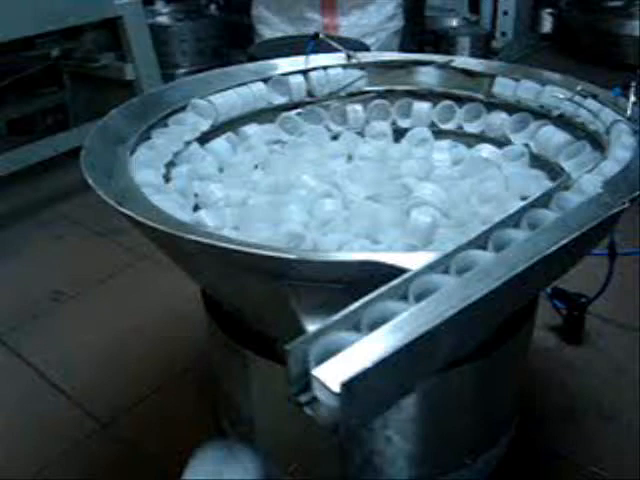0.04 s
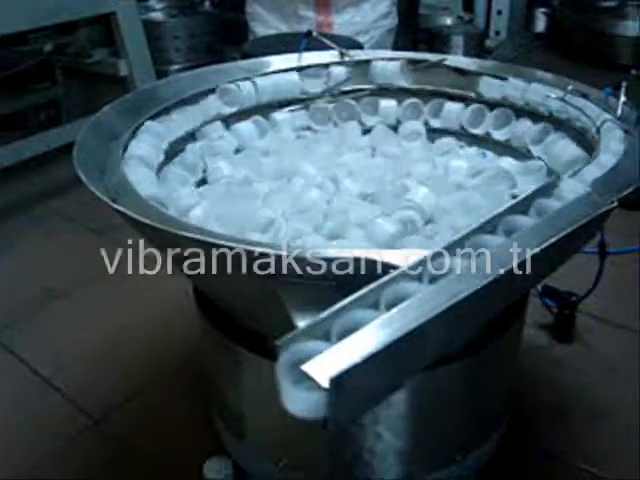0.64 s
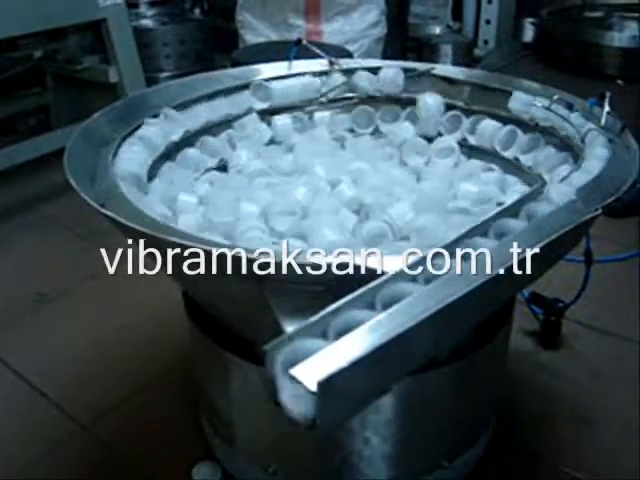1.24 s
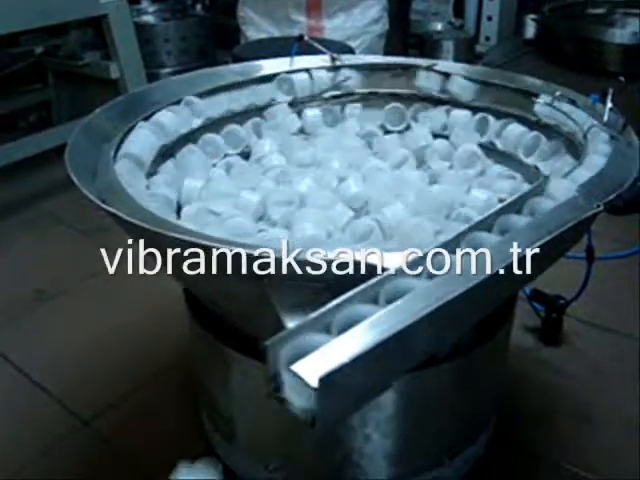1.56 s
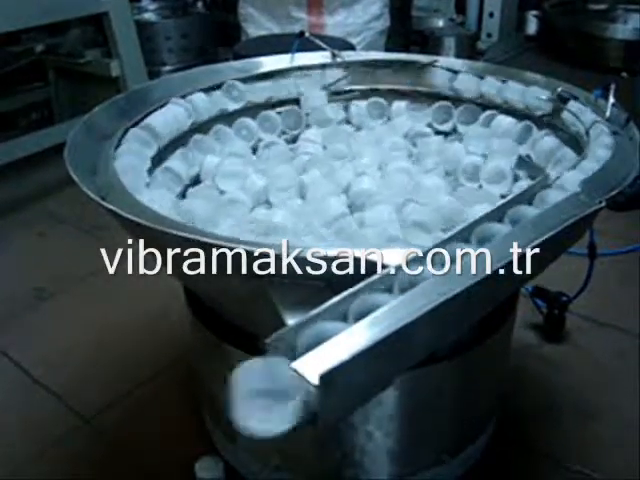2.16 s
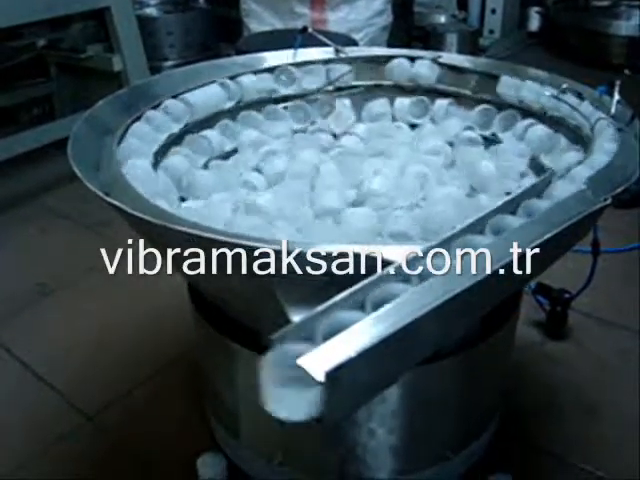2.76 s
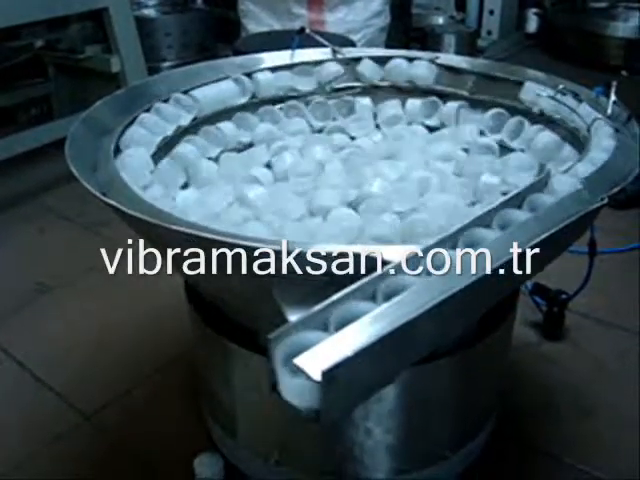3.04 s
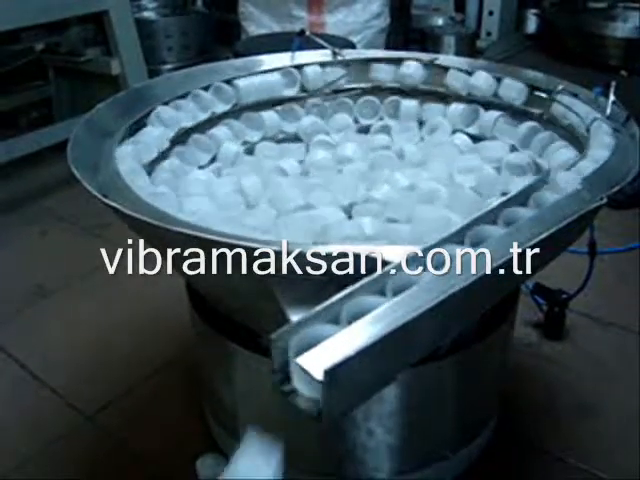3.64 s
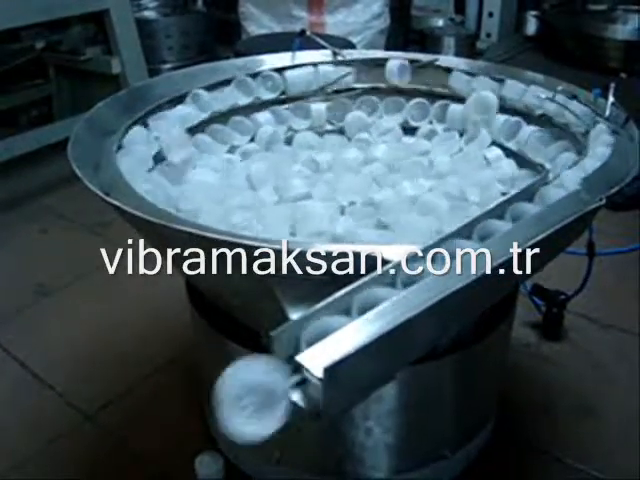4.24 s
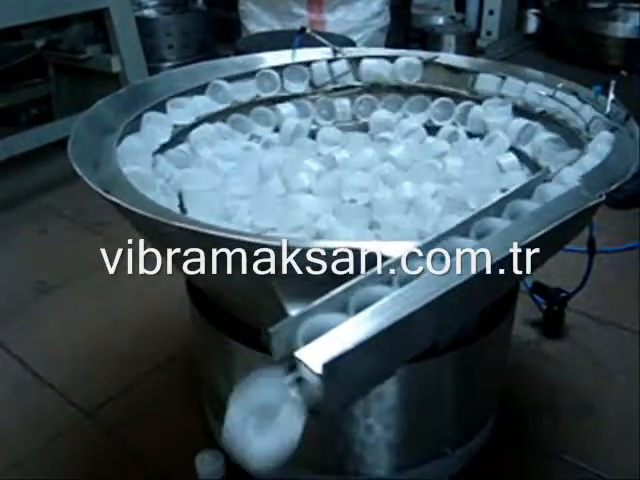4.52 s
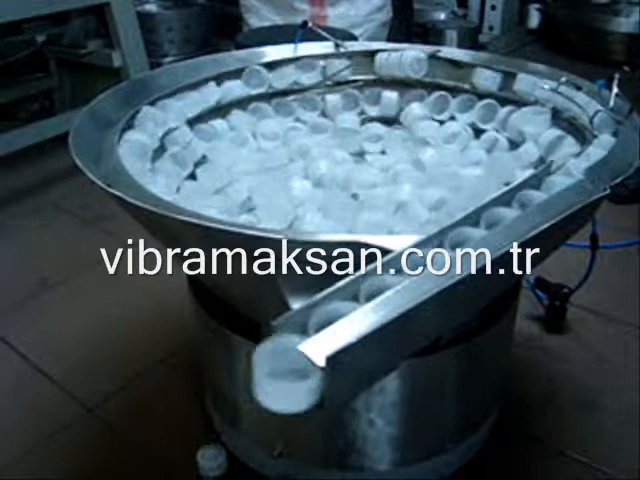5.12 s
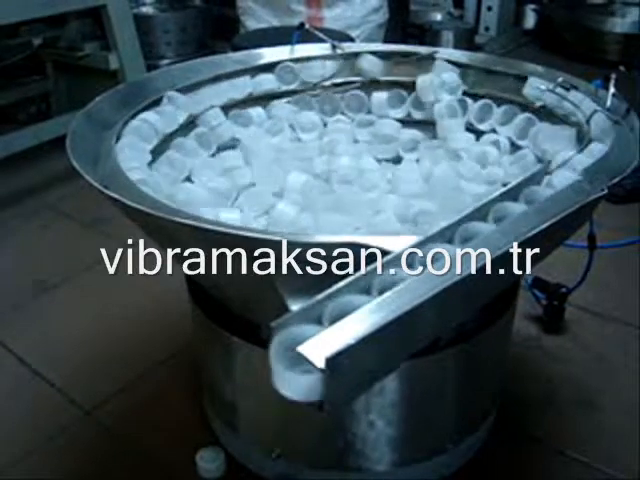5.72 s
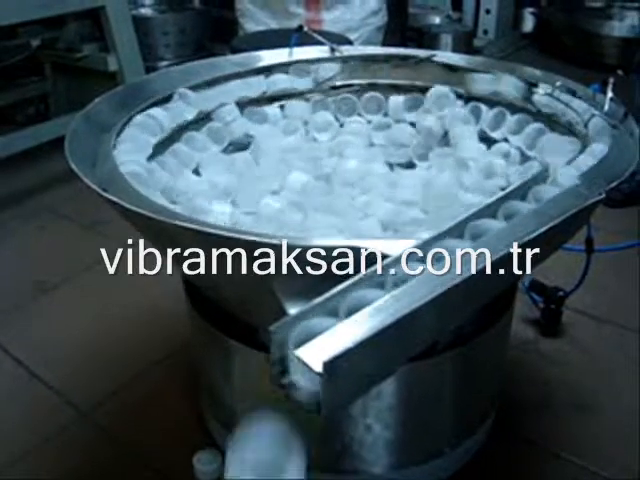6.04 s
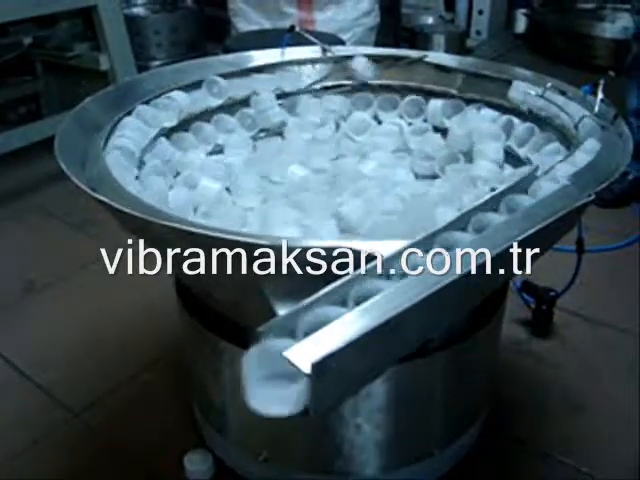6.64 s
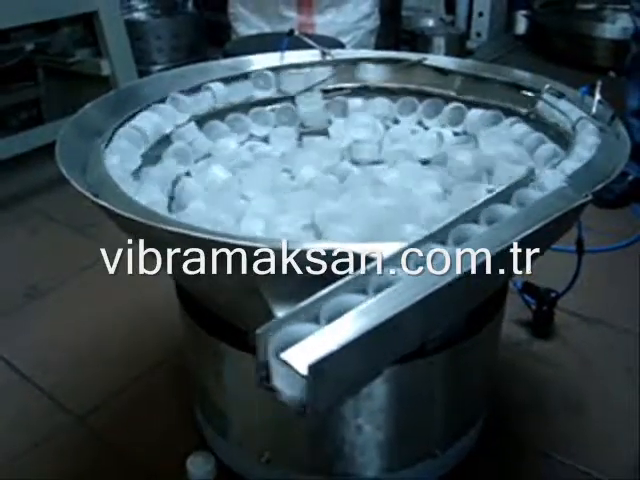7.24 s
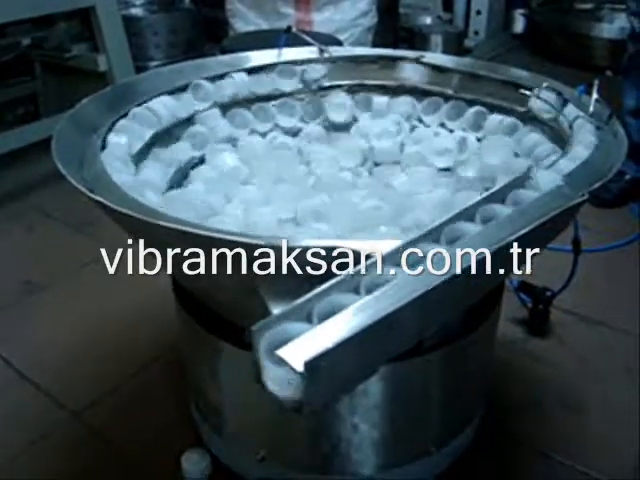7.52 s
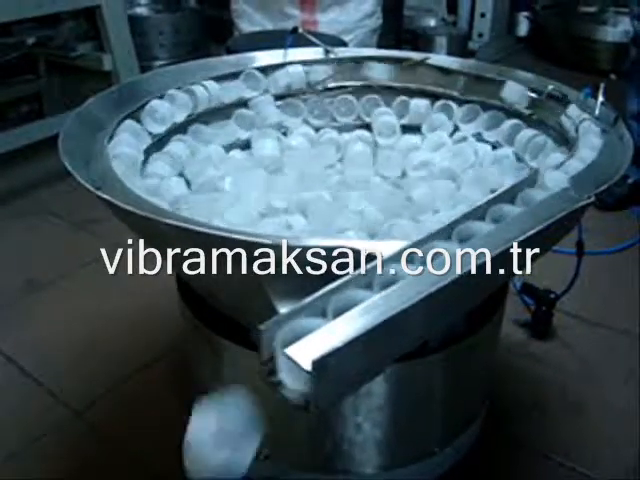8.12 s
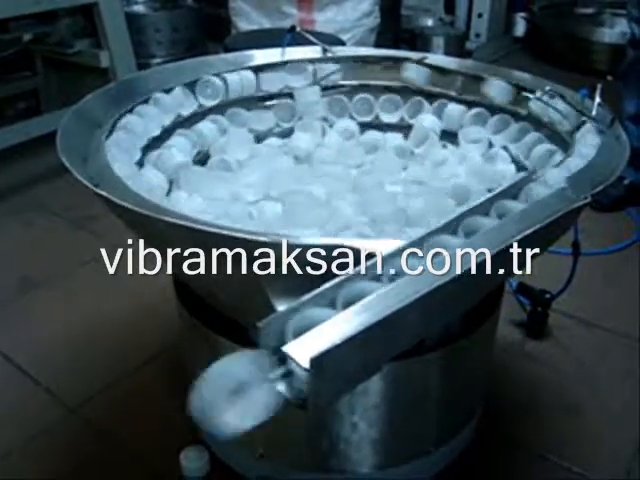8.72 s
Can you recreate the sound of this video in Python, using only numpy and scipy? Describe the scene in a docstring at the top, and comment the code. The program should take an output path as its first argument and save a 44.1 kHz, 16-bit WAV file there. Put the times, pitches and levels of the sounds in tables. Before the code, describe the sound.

Plastic caps chatter continuously in a shaking metal bowl over a faint hum, some clacking on the steel or dropping with hollow knocks.

```python
"""A workshop, one microphone on a running vibratory bowl feeder: hundreds of hollow plastic caps chatter
on the shaking steel. The heap surges gently, its clicks ring the bowl, and the drive hums underneath.
Now and then a cap clacks or drops with a hollow knock; one dull bump sounds over the room's faint rush.
The microphone is a small camera's, switched on after a moment: a narrow band with sample-and-hold fizz."""
import sys
import numpy as np
from scipy import signal
from scipy.fft import rfft, irfft, next_fast_len
from scipy.io import wavfile
from scipy.ndimage import map_coordinates

SR = 44100
rng = np.random.default_rng(int(sys.argv[2]) if len(sys.argv) > 2 else 0)


def log_audio(samples):
    """Write samples as a 16-bit WAV file to the path given in sys.argv[1]."""
    # one column per channel
    frames = np.atleast_2d(samples).T
    # limit to full scale, then quantise
    limited = np.clip(frames, -1, 1)
    pcm = np.round(limited * 32767).astype(np.int16)
    wavfile.write(sys.argv[1], SR, pcm)


N = 391166
SHAKE_HZ, ROOM_T60_S = 100, 0.57
BAND_HZ = 4540  # upper edge of the camera's band, and the width of the span of the ticks' pitches above 250 Hz


def chatter():
    """The heap surges on the steel: heavy contacts carry the swell, light ones in the treble follow less."""
    # Loudness of the heap. Each row: time in seconds, level in dB, swing of the surges in dB.
    heap_levels = [(.18, -19.5, .2), (.6, -21.5, 0.2), (1.8, -20.9, 0.8), (2.2, -21, 0.1), (3.3, -21, 0.5),
                   (4.5, -21.6, -0.3), (5.55, -21.5, .4), (6.12, -20, 0.5), (6.55, -21, 1),
                   (6.9, -20.5, 0.5), (7.4, -20.5, -0.2), (7.8, -21.6, 0.5), (8.1, -21, 1.0),
                   (8.5, -21, -0.1)]
    sound = unit(plastic_caps() + amp(-10.5) * steel_bowl())
    treble = filtered(sound, lambda hz: 1 - 1 / (1 + (hz / 2300) ** 8))
    level_db, swing_db = curves(heap_levels)
    surge_db = swing_db * surges()
    flicker_db = 0.5 * wobble(per_s=8)
    heavy = amp(level_db + surge_db) * (sound - treble)
    light = amp(-20.5 + 0.59 * surge_db + flicker_db) * treble
    jostle_db = 0.11 * wobble(per_s=9)
    return amp(jostle_db) * (heavy + light)


def plastic_caps():
    # Colour of the chattering caps. Each row: frequency in Hz, gain in dB.
    colour = [(170, -44), (335, -35.5), (390, -16), (620, -17), (780, -12.5), (1150, -3.5), (1750, -2),
              (2060, -1.5), (2250, -6.5), (2800, -5), (3250, -7), (3800, -12.5), (4500, -13.5)]
    ticks = contacts(count=20000, spread_db=2.5, t60=0.011, scatter_cycles=.35)
    heap = unit(workshop(ticks + amp(4.5) * snaps(count=9000), wet_db=-1))
    return unit(filtered(heap, lambda hz: amp(along(colour, hz))))


def contacts(count, spread_db, t60, scatter_cycles):
    """Tiny ticks of plastic, thrown loosely in step with the shaking, each at its own pitch."""
    when, pitch = rng.random((count, 2)).T
    strength, late, life = rng.standard_normal((count, 3)).T
    cycle = np.floor(when * N / SR * SHAKE_HZ)
    times = (cycle + scatter_cycles * late) / SHAKE_HZ
    gains = amp(spread_db * np.clip(strength, -2, 2))
    return unit(rings(times, gains, 250 + pitch * BAND_HZ, t60 * np.exp(0.2 * life), samples=400))


def snaps(count):
    """Rim against steel: clicks that excite all pitches at once."""
    at = (rng.random(count) * N).astype(int)
    return unit(np.bincount(at, rng.choice([-1., 1.], count), N))


def surges(first_crest_s=.14):
    """The heap bunches up and loosens about three times a second: a curve between -1 and 1."""
    # Pace of the surging. Each row: time in seconds, surges per second.
    pace = [(6.1, 2.97), (6.3, 2.66)]
    rate, = curves(pace)
    return np.cos(2 * np.pi * (np.cumsum(rate) / SR - first_crest_s * rate[0]))


def steel_bowl():
    """A hail of clicks keeps the bowl's resonances ringing."""
    # Modes of the bowl. Each row: centre in Hz, width in Hz, relative level in dB.
    modes = [(297, 26, -10), (395.7, 14, -4), (534, 42, -11.5), (659, 3.6, -5.5), (691, 8.6, 2),
             (712.4, 14.8, 6.5), (808, 7.3, -9), (868.4, 13.6, 3), (919.5, 19, 1.5), (1596, 11, 9),
             (1814, 87, 7.5), (2025, 80, 1), (2674, 8.1, 9), (3340, 20, -5)]

    def resonance(hz):
        return sum(amp(db) * 1j * hz * width / (centre ** 2 - hz ** 2 + 1j * hz * width)
                   for centre, width, db in modes)
    return unit(band(filtered(snaps(count=12000), resonance), low_hz=243, high_hz=4600))


def clacks():
    """Single caps hit the steel, hard or lightly: a bright note and a crack."""
    # The hardest strikes. Each row: start in seconds, relative level in dB, pitch in Hz.
    hard_clacks = [(0.9713, -3, 1690), (1.9589, -1, 1760), (2.9053, 1, 2080), (3.4496, 1, 1680),
                   (3.522, 0, 1750), (4.8216, -1, 1250), (5.9028, 1, 1850), (6.486, -3, 1700),
                   (7.66, 2, 2130), (8.077, 0, 1570), (8.3764, -1, 2040)]
    times, db, hz = np.vstack([hard_clacks, light_clacks(count=14)]).T
    note = rings(times, amp(db), hz, t60=.02, samples=2000)
    blows = note + amp(1) * cracks(times, db, t60=.012)
    return amp(-13) * band(workshop(blows, wet_db=-1.5), low_hz=990, high_hz=3500)


def light_clacks(count):
    """Lighter strikes at random. Each row: start in seconds, relative level in dB, pitch in Hz."""
    strength, detune = rng.standard_normal((count, 2)).T
    times = rng.random(count) * N / SR
    return np.column_stack([times, -9 + 5 * strength, 1830 * np.exp(0.066 * detune)])


def drops():
    """Falling caps land with a hollow knock and a slap of the rim, a little different each time."""
    # Caps landing. Each row: start in seconds, relative levels of knock and rim slap in dB.
    landings = [(0.766, -29, -28), (1.145, -27, -20), (1.773, -24, -28), (2.113, -26, -24),
                (2.124, -20.5, -21), (2.502, -23, -22), (3.55, -29, -25), (3.927, -24, -21),
                (5.534, -20, -29), (5.827, -24.5, -29), (6.621, -24, -23), (8.405, -29, -25)]
    # Hollow ring of a cap. Each row: pitch in Hz, relative level in dB, seconds to fall 60 dB.
    cap_modes = [(450, -2, .025), (540, 0, .025), (630, -1, .025)]
    times, knock_db, slap_db = np.transpose(landings)
    knocks = amp(10) * cracks(times, knock_db, t60=0.024)
    for hz, mode_db, t60 in cap_modes:
        strength, detune = rng.standard_normal((len(times), 2)).T
        gains = amp(knock_db + mode_db + strength)
        knocks += rings(times, gains, hz * np.exp(0.023 * detune), t60, samples=3000)
    body = amp(-3) * band(knocks, low_hz=400, high_hz=850)
    rim_hz = 900 * np.exp(0.067 * rng.standard_normal(len(times)))
    rim = rings(times, amp(slap_db + 3.5), rim_hz, t60=.02, samples=2000)
    slap = band(rim + amp(5) * cracks(times, slap_db, t60=.036), low_hz=744, high_hz=1130)
    return workshop(body + slap, wet_db=-15)


def bump():
    """One dull, low thud with a short puff of noise."""
    # The thud. Each row: start in seconds, relative level in dB.
    thuds = [(6.488, -49)]
    times, db = np.transpose(thuds)
    thud = rings(times, amp(db), hz=120., t60=.045, samples=4000)
    return amp(4) * band(thud + amp(12) * cracks(times, db, t60=.07), low_hz=55, high_hz=300)


def drive(rock_hz=16.31):
    """The bowl on its springs hums in slightly unsteady lines, all multiples of its slow rocking."""
    # Lines of the hum. Each row: multiple of the rocking rate, relative level in dB.
    hum_lines = [(12, -21.5), (14, -11.5), (15, -2), (16, -5.5), (17, 0.5), (19, -17), (20, -17), (29, -4),
                 (32, 0.5)]
    turns = rock_hz * np.arange(N) / SR + 0.0012 * wobble(per_s=3)
    hum = sum(amp(db + 0.94 * wobble(per_s=4.4)) * np.sin(2 * np.pi * (multiple * turns + rng.random()))
              for multiple, db in hum_lines)
    return amp(-49) * unit(hum)


def room_tone():
    """Faint low rush of the workshop."""
    # Colour of the rush. Each row: frequency in Hz, gain in dB.
    colour = [(10, 0), (40, -1.5), (150, 2), (250, -3), (400, 3), (900, -32)]
    return amp(-64) * unit(filtered(rng.standard_normal(N), lambda hz: amp(along(colour, hz))))


def workshop(x, wet_db):
    """Direct sound plus an echo that differs from place to place in the bowl: a new tail every 20 ms."""
    out, hop = np.pad(x, (0, SR)), SR // 50
    fade = amp(-60 * np.arange(SR // 4) / SR / ROOM_T60_S)
    for start in range(0, N, hop):
        tail = fade * rng.standard_normal(len(fade))
        echo = signal.fftconvolve(x[start:start + hop], tail / np.linalg.norm(tail))
        out[start:start + len(echo)] += amp(wet_db) * echo
    return out[:N]


def rings(times, gains, hz, t60, samples):
    """A damped sine at each contact, falling 60 dB in t60 seconds."""
    t = np.arange(samples) / SR
    decay = amp(-60 * t / np.reshape(t60, (-1, 1)))
    waves = gains[:, None] * decay * np.sin(2 * np.pi * np.reshape(hz, (-1, 1)) * t)
    at = (np.abs(times) * SR).astype(int)[:, None] + np.arange(samples)
    return np.bincount(at.ravel(), waves.ravel(), N)[:N]


def cracks(times, levels_db, t60):
    """A short burst of noise at each blow."""
    t, out = np.arange(SR // 15) / SR, np.zeros(N + SR)
    for start, db in zip(times, levels_db):
        out[round(start * SR):][:len(t)] += amp(db - 60 * t / t60) * rng.standard_normal(len(t))
    return out[:N]


def amp(db):
    """Decibels to gain."""
    return 10 ** (np.asarray(db) / 20)


def unit(x):
    """x at rms 1."""
    return x / np.sqrt(np.mean(x ** 2) + 1e-20)


def along(points, hz):
    """(Hz, value) points read on a log axis."""
    knots_hz, values = np.transpose(points)
    return np.interp(np.log(hz + 1), np.log(knots_hz + 1), values)


def curves(rows):
    """One value per sample for each column after the time."""
    times, *columns = np.transpose(rows)
    return [np.interp(np.arange(N) / SR, times, column) for column in columns]


def wobble(per_s):
    """A smooth random curve with per_s knots a second."""
    return map_coordinates(rng.standard_normal(int(N * per_s / SR) + 4), [np.arange(N) * per_s / SR])


def filtered(x, response):
    """x shaped by a gain that depends on frequency."""
    size = next_fast_len(N + SR // 2)
    return irfft(rfft(x, size) * response(np.fft.rfftfreq(size, 1 / SR)), size)[:N]


def band(x, low_hz, high_hz):
    """A causal band-pass."""
    return signal.sosfilt(signal.butter(3, [low_hz, high_hz], 'band', fs=SR, output='sos'), x)


def scene():
    """The feeder and the room, as they reach one microphone."""
    return (chatter() + clacks() + drops() + bump() + drive() + room_tone())[None]


def record(dry):
    """The camera keeps a narrow band; holding each sample mirrors that band into a faint treble fizz."""
    switch_on_s, hold_hz, top_hz = .172, 32012, 15750
    narrow = filtered(dry[0], lambda hz: 1 / np.sqrt(1 + np.minimum(hz / BAND_HZ, 2) ** 240))
    held_at = np.floor(np.arange(N) * hold_hz / SR) * SR / hold_hz
    held = map_coordinates(narrow, [held_at])
    running = np.clip((np.arange(N) / SR - switch_on_s) / .002, 0, 1)
    return filtered(held * running, lambda hz: hz < top_hz)[None]


dry = scene()
out = record(dry)
log_audio(out)
```